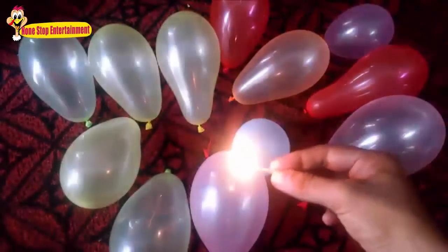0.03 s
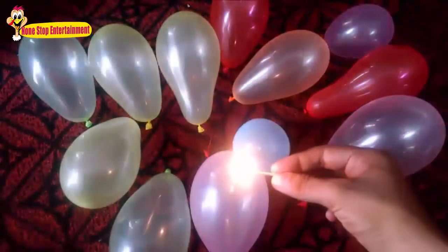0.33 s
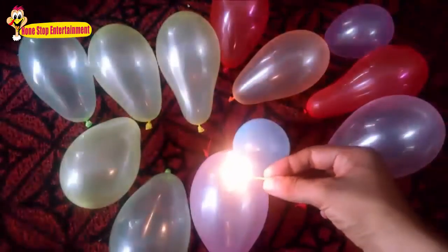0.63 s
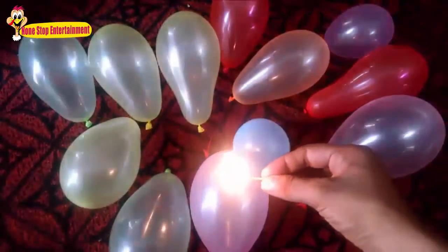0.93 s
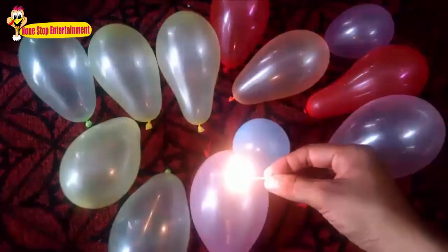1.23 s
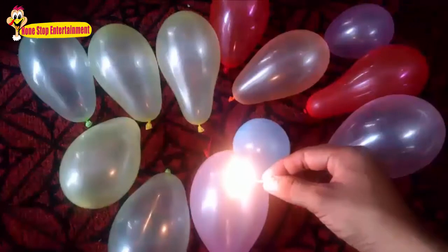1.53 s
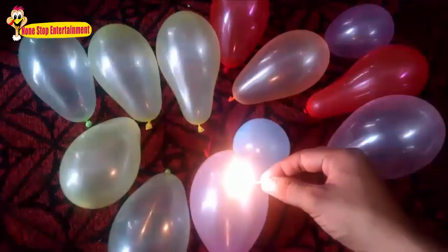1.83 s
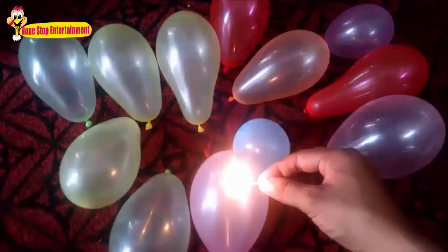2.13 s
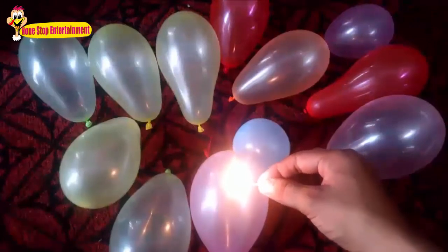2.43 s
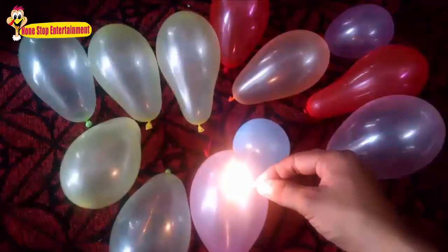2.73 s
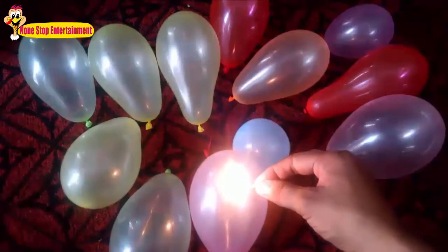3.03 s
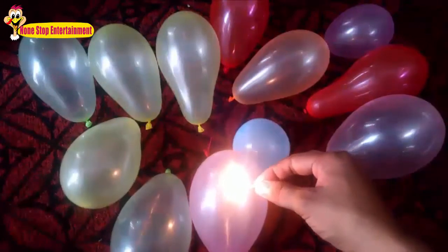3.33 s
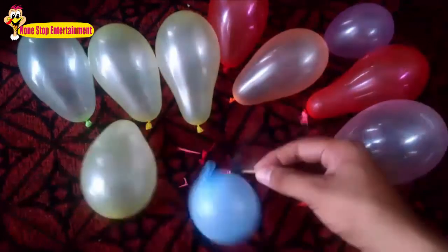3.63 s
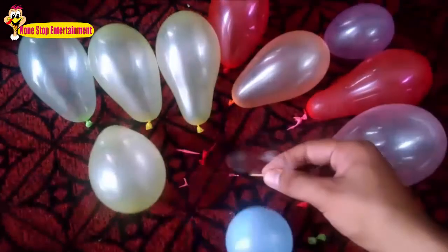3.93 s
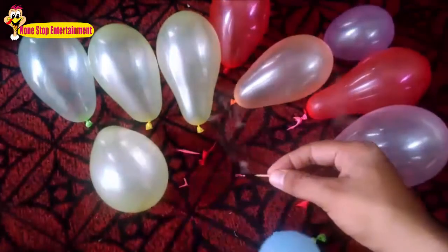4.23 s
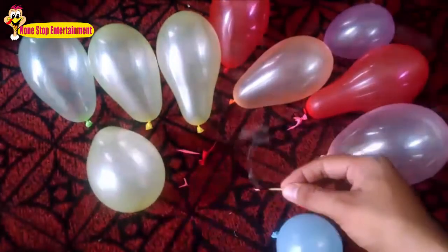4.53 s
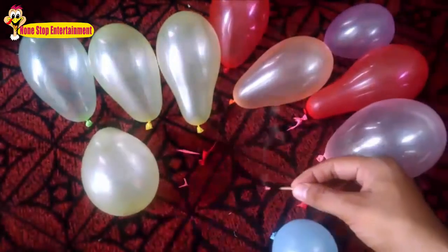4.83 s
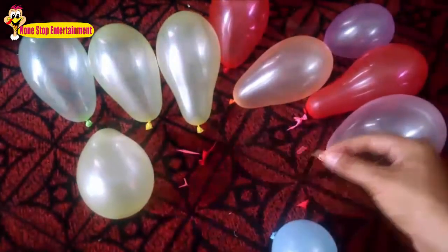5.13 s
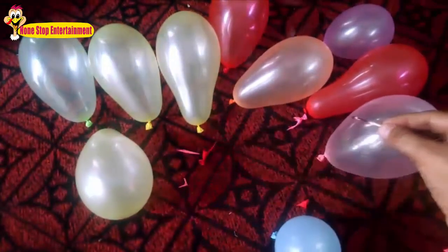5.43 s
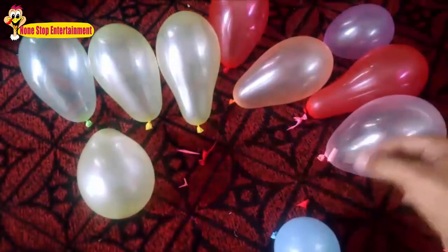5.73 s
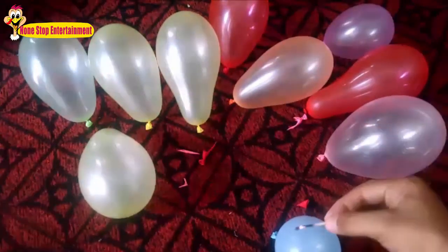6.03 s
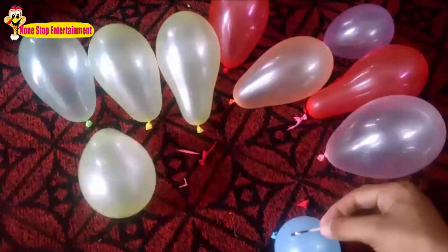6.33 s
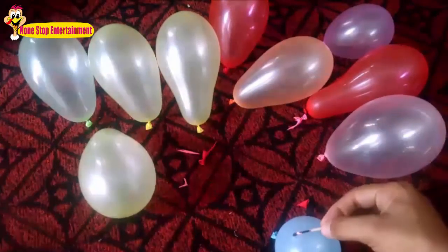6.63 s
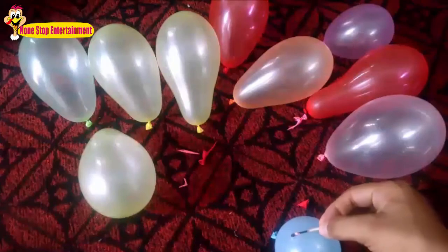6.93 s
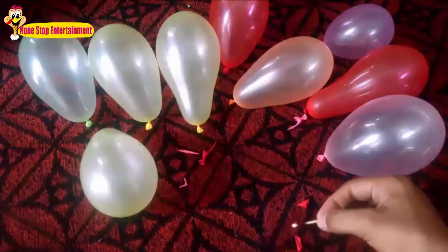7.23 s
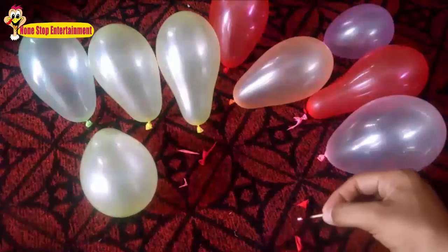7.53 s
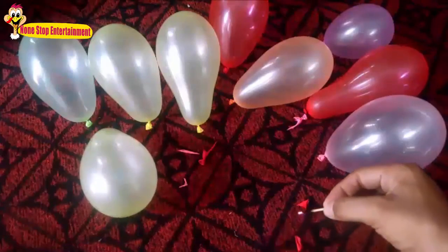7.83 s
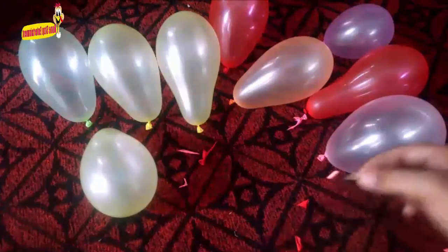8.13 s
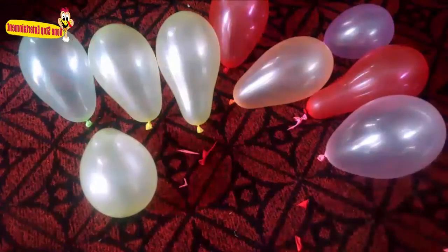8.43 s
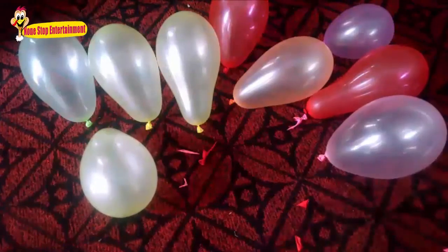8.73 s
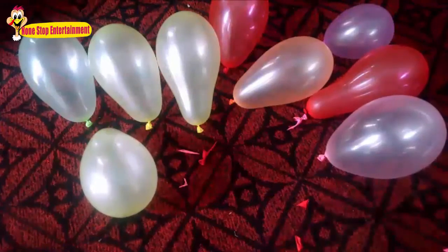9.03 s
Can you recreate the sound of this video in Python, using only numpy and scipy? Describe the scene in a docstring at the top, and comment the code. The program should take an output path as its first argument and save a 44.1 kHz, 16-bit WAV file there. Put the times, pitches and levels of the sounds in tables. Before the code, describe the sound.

A fan hums and hisses in a small room. A balloon bursts with a sharp, echoing bang that overloads the phone microphone, and the fan noise sinks away and creeps back. A few close scuffs, thumps and a snap follow. The fan's rush suddenly turns loud, then a second balloon bursts just as hard. The low hum returns and swells twice. The sound cuts out briefly three times along the way.

```python
"""A fan hums and hisses in a small carpeted room; after a scuff, the sound cuts out briefly. The level dips,
and a balloon bursts at a match flame: its skin rips, the walls echo, the room rings. The phone clips and ducks
its gain, so the fan sinks away and creeps back. Scuffs, thumps and a snap follow, and the sound cuts out twice
more. The level then jumps up loud until a second balloon bursts and overloads the phone again. As the gain
recovers, the deep hum wells up twice."""
import sys
import numpy as np
from scipy import signal
from scipy.fft import rfft, irfft
from scipy.io import wavfile
from scipy.ndimage import uniform_filter1d

SR = 44100
rng = np.random.default_rng(int(sys.argv[2]) if len(sys.argv) > 2 else 0)


def generate_wav(sig):
    """Save sig (samples, or channels by samples) to the path in sys.argv[1] as 16-bit PCM at SR."""
    pcm = np.round(np.clip(np.atleast_2d(sig).T, -1, 1) * 32767).astype(np.int16)
    wavfile.write(sys.argv[1], SR, pcm)


N = 409248
TIME = np.arange(N) / SR
FREQ = np.maximum(np.arange(N // 2 + 1) * SR / N, 1)
PORT_LAG_S = .000394  # travel time of sound between the phone's two microphone ports

# balloon bursts: (time [s], level [dB], rise [s], tilt [dB/octave], skin's bright band [Hz], lift [dB])
BURSTS = [(3.5277, 11, .0005, 0.2, 7400, 7), (7.3052, 12, 0.018, 0.7, 4600, 5)]
# spectrum of tearing rubber: (frequency [Hz], relative level [dB])
CRACK_SPECTRUM = [(30, 1.5), (90, -21), (200, -6.5), (330, -4), (520, -0.5), (1200, -2), (2200, -5),
                  (4500, -8.5), (7500, -8), (10000, -7), (15000, -12)]
# spectrum of the room's reverberation: (frequency [Hz], relative level [dB])
RING_SPECTRUM = [(40, -18.5), (130, 0.5), (300, -1), (700, 6), (1400, -2), (2300, -6.5), (4000, -5.5),
                 (7500, -3), (10500, -7), (15000, -20.5)]
# reverberation time: (frequency [Hz], time to fall 60 dB [s])
ROOM_T60 = [(100, 1), (600, 0.65), (2500, 0.73), (7000, 0.67), (14000, 0.51)]
# room resonances: (frequency [Hz], width [Hz], lift [dB])
ROOM_MODES = [(517, 71, 3.5), (854, 90, 5.5), (1280, 110, 7.5), (1490, 90, 4), (3620, 350, 1)]
# clusters of wall reflections: (time [s], level [dB], spread [s], boom frequency [Hz], boom lift [dB])
ECHOES = [(3.572, 3.5, 0.016, 534, 24), (3.596, 1, 0.0075, 900, 6), (3.636, -10.5, .016, 930, 19),
          (3.671, -13, 0.0059, 900, 3), (3.708, -26, 0.016, 830, 20), (7.346, 0.5, 0.012, 530, 11),
          (7.365, 8.5, 0.0054, 1100, 7), (7.391, -5.5, .007, 900, -4)]
# scuffs of hand and rubber, the last as the skin starts to give:
# (time [s], peak level [dB], centre [Hz], width [Hz], left minus right [dB])
SCUFFS = [(2.375, -24, 4000, 2900, 0), (4.811, -19, 1000, 2400, 2), (4.8856, -12, 1800, 4000, 1),
          (5.2, -20, 900, 1300, 4.5), (7.288, -3.5, 2710, 1200, 3)]
# thumps on the phone: (time [s], peak level [dB], frequency [Hz], decay [s], left minus right [dB])
THUMPS = [(3.536, 6, 190, .009, 1.5), (4.815, -9, 76, .007, 1.5), (4.893, -14, 76, 0.0088, 0),
          (5.203, -3.5, 82.6, 0.013, -2), (7.31, -4, 54.5, 0.012, 8), (7.440, 0, 34, 0.018, 4)]
# resonances of the snap: (frequency [Hz], width [Hz], relative level [dB])
SNAP_MODES = [(6500, 4000, -3), (2200, 1300, 1), (1320, 200, -4)]
# spectrum of air rushing through the fan: (frequency [Hz], relative level [dB])
AIR_SPECTRUM = [(28, -5), (46, -10), (64, 0), (85, -6), (145, 3), (205, -3), (330, -6.5), (560, -3.5),
                (950, -9.5), (1800, -15), (2450, -15.5), (2900, -14), (3500, -18.5), (5000, -19),
                (9000, -23), (10300, -28.5), (11500, -27.5), (14000, -31), (15500, -37.5)]
# resonances that colour the rushing air: (frequency [Hz], width [Hz], lift [dB])
AIR_MODES = [(880, 25, -0.5), (1293, 32, 2.5), (1480, 40, 1)]
# motor hum: (frequency [Hz], level [dB], left minus right [dB], phase lead of left [rad])
HUM_PARTIALS = [(66, -48.5, -8.5, 1.6), (125.7, -44.5, -13.5, 0.69), (249.4, -40.5, -3.5, -1.55),
                (501, -50, -9.5, 1), (520, -49, -13.5, 0.24), (619.4, -45.5, -2.5, 0.57),
                (820, -51.5, 3.5, 0.022)]
# second motor: (frequency [Hz], relative level [dB], left minus right [dB], phase lead of left [rad])
DRONE_PARTIALS = [(124, -6, -5, .9), (169, -4, -1.5, 1.3), (252, 0.5, -8, -1)]
# spells in which the second motor is heard: (start [s], end [s], level [dB])
DRONE_SPELLS = [(3.147, 5.3, -34.5), (7.352, 8.903, -36.5)]
# swells of the deep hum: (time of crest [s], level [dB], spread [s])
HUM_SWELLS = [(7.12, -36.5, 0.11), (8.43, -30, 0.041), (8.76, -30.5, 0.039)]
# mismatch of the ports: (frequency [Hz], left minus right [dB], phase lead of left [rad])
PORT_MISMATCH = [(30, -2.5, 2.5), (65.2, -10, 2), (168, -6.5, 1), (241, -4, 1.04), (345, -5.5, -2.5),
                 (416, -2.5, 0.6), (910, -3, 0.51), (1480, -1, 0.5)]
# brief silences: (start [s], end [s])
GAPS = [(2.506, 2.670), (5.231, 5.272), (5.740, 6.039)]


def balloon_bursts(crack_t60=0.37, damping_hz=20000, skin_width_hz=2500, ring_db=-9.5, build_s=0.028):
    """Rupture and reverberation: the skin rips, the blast darkens as walls scatter it, the room rings."""
    out, age = np.zeros((2, N)), np.arange(SR) / SR
    blast = diffuse_field(cross=0.19, mismatch=0.69) * modal_gain(ROOM_MODES) ** 0.65
    room = diffuse_field(mismatch=0.79) * undb(across(RING_SPECTRUM, FREQ)) * modal_gain(ROOM_MODES)
    room_bands = split_bands(room)
    ragged = undb(2.0 * waver(130))
    for start, db, rise_s, tilt_db, skin_hz, skin_db in BURSTS:
        span = slice(int(start * SR), int(start * SR) + SR)
        colour = undb(across(CRACK_SPECTRUM, FREQ) + tilt_db * np.log2(FREQ / 2000))
        colour *= modal_gain([(skin_hz, skin_width_hz, skin_db)])
        crack = sum(band[:, span] * decay(age, crack_t60 / (1 + (hz / damping_hz) ** 2))
                    for hz, band in split_bands(blast * colour))
        crack *= ragged[span] * (1 - np.exp(-age / rise_s))
        ring = sum(band[:, span] * decay(age, across(ROOM_T60, hz)) for hz, band in room_bands)
        ring *= 1 - np.exp(-age / build_s)
        out[:, span] += undb(db) * (crack + undb(ring_db) * ring)
    return out


def wall_echoes(dull_hz=2500, boom_width_hz=140):
    """Early reflection: the walls return each bang in booming clusters that have lost some treble."""
    reflected = diffuse_field(mismatch=.5) / (1 + (FREQ / dull_hz) ** 2) ** 0.4
    out = np.zeros((2, N))
    for time, db, spread_s, boom_hz, boom_db in ECHOES:
        boom = undb(boom_db * abs(resonance(boom_hz, boom_width_hz)))
        out += undb(db) * unit_rms(irfft(reflected * boom, N)) * bell(time, spread_s)
    return out


def scuffs(rise_s=0.0049, decay_s=0.009):
    """Friction: short scrapes of hand and rubber drive a broad resonance with noise."""
    out, friction = np.zeros((2, N)), diffuse_field(mismatch=0.41)
    for start, db, hz, width_hz, side_db in SCUFFS:
        age = TIME - start
        push = np.clip(age / rise_s, 0, 1) * np.exp(-np.clip((age - rise_s) / decay_s, 0, 20))
        scrape = irfft(friction * resonance(hz, width_hz), N)
        out += pan(side_db) * at_peak(push * scrape, db)
    return out


def thumps(rise_s=0.001):
    """Impulse response: handling and each burst's puff of air set off a few low swings at the phone."""
    age = np.arange(SR // 3) / SR
    onset = 1 - np.exp(-age / rise_s)
    return sum(close_by(onset * damped_sine(age, hz, decay_s), start, db, side_db)
               for start, db, hz, decay_s, side_db in THUMPS)


def snap():
    """Free vibration: one sharp snap rings in modes that die the faster the wider they are."""
    age = np.arange(SR // 3) / SR
    ring = sum(at_peak(damped_sine(age, hz, 1 / (np.pi * width)), db) for hz, width, db in SNAP_MODES)
    return close_by(ring, start=4.893, db=2.5, side_db=-2)


def fan_air(level_db=-29.5, flicker_db=1.47):
    """Flow noise: air rushing through the fan flickers band by band and flutters as a whole."""
    rush = diffuse_field(cross=0.82, ripple_db=1.9) * undb(across(AIR_SPECTRUM, FREQ))
    bands = split_bands(rush * modal_gain(AIR_MODES))
    air = sum(band * undb(flicker_db * waver(25)) for _, band in bands)
    flutter = 1 + 0.063 * waver(35) + 0.091 * waver(6.6)
    return undb(level_db) * air * flutter


def fan_motors(attack_s=0.33, release_s=0.63):
    """Periodic vibration: one motor hums throughout, a second drones in spells, a deep tone swells."""
    hum = sum(undb(db) * motor_tone(hz, side_db, phase) for hz, db, side_db, phase in HUM_PARTIALS)
    drone = sum(undb(db) * motor_tone(hz, side_db, phase, depth=.1, drift_rad=0.95)
                for hz, db, side_db, phase in DRONE_PARTIALS)
    spells = sum(undb(db) * gate(start, end, attack_s, release_s) for start, end, db in DRONE_SPELLS)
    swells = sum(undb(db) * bell(time, spread_s) for time, db, spread_s in HUM_SWELLS)
    return hum + spells * drone + swells * motor_tone(hz=126.1, side_db=-9.5, phase=0.7)


def motor_tone(hz, side_db, phase, depth=.18, drift_rad=0.5):
    """Random modulation: one partial of a motor wavers in amplitude and phase."""
    angle = 2 * np.pi * hz * TIME + drift_rad * waver(3.3) + np.array([[phase], [-phase]]) / 2
    return np.sqrt(2) * np.sin(angle) * (1 + depth * waver(29)) * pan(side_db)


def level_envelope():
    """Amplitude envelope: the level dips and creeps back, then surges until the second burst."""
    dip_at, dip_db, drop_s, recover_db_per_s = 3.138, -12, 0.02, 15.5
    surge_at, surge_db, jump_s, release_s = 6.504, 13, 0.0039, .07
    overshoot_db, settle_s, crest_db = 4, 0.13, 3
    dip = np.minimum(dip_db + recover_db_per_s * (TIME - dip_at), 0)
    dip *= np.clip((TIME - dip_at) / drop_s, 0, 1)
    overshoot = overshoot_db * np.exp(-np.maximum(TIME - surge_at, 0) / settle_s)
    crest = crest_db * bell(time=6.97, spread_s=0.11)
    surging = gate(surge_at, BURSTS[-1][0] + release_s, jump_s, release_s)
    return undb(dip + (surge_db + overshoot + crest) * surging)


def diffuse_field(cross=0.96, mismatch=1.0, ripple_db=1.5):
    """Spatial coherence: the spectrum of room-filling noise at two ports, less alike as pitch rises."""
    mid, side, direct = rfft(rng.standard_normal((3, N)))
    sign = np.array([[1], [-1]])
    delay = np.exp(-2j * np.pi * FREQ * PORT_LAG_S)
    coherence = 0.94 * np.sinc(2 * FREQ * PORT_LAG_S)
    # above the bass each port has the delayed other one taken from it: wider stereo, combed mid and side
    crossfeed = cross * delay / (1 + (FREQ / 4900) ** 4) / (1 + (170 / FREQ) ** 4)
    mid_gain = np.sqrt(1 + coherence) * (1 - crossfeed)
    side_gain = np.sqrt(1 - coherence) * (1 + crossfeed)
    pair = (mid_gain * mid + sign * side_gain * side) / np.hypot(abs(mid_gain), abs(side_gain))
    # part of the treble comes straight from the right and reaches the left late and inverted
    shade_db = 2.0 * abs(resonance(5300, 6000)) ** 2
    share = 0.72 * abs(resonance(8500, 14000))
    from_right = np.array([-delay * undb(-shade_db), undb(shade_db)])
    pair = pair * np.sqrt(1 - share ** 2) + share * direct * from_right
    hz, *columns = np.transpose(PORT_MISMATCH)
    side_db, phase = (mismatch * np.interp(np.log(FREQ), np.log(hz), column) * sign / 2
                      for column in columns)
    # standing waves lift and sink narrow bands
    ripple = unit_rms(uniform_filter1d(rng.standard_normal(len(FREQ)), size=150))
    return pair * undb(side_db + ripple_db * ripple) * np.exp(1j * phase * (FREQ < hz[-1]))


def close_by(sound, start, db, side_db):
    """Path difference: the left port takes in a sound right at the phone late and inverted."""
    right = np.zeros(N)
    first = int(start * SR)
    right[first:first + len(sound)] = at_peak(sound, db)
    left = -np.roll(right, int(PORT_LAG_S * SR))
    return pan(side_db) * np.array([left, right])


def resonance(hz, width_hz):
    """Frequency response of a damped oscillator."""
    return 1 / (1 + 1j * (FREQ / hz - hz / FREQ) * hz / width_hz)


def modal_gain(modes):
    """Resonant colouring: each mode lifts or lowers a flat response around its frequency."""
    return undb(sum(db * abs(resonance(hz, width_hz)) ** 2 for hz, width_hz, db in modes))


def damped_sine(age, hz, decay_s):
    """Free motion of a damped oscillator."""
    return np.sin(2 * np.pi * hz * age) * np.exp(-age / decay_s)


def decay(age, t60):
    """Exponential decay by 60 dB in t60 seconds."""
    return np.exp(-np.log(1000) * age / t60)


def gate(start, end, attack_s, release_s):
    """Trapezoidal envelope: rise from 0 at the start, hold at 1, fall to 0 at the end."""
    return np.clip(np.minimum((TIME - start) / attack_s, (end - TIME) / release_s), 0, 1)


def bell(time, spread_s):
    """Gaussian envelope of height 1."""
    return np.exp(-((TIME - time) / spread_s) ** 2)


def waver(rate_hz, size=16384):
    """Low-passed noise: a slow random fluctuation of rms 1."""
    slow = irfft(rfft(rng.standard_normal(size)) / (1 + (FREQ[:size // 2 + 1] / rate_hz) ** 4))
    return unit_rms(np.interp(np.linspace(0, size - 1, N), np.arange(size), slow))


def split_bands(spectrum, count=7):
    """Filter bank: overlapping bands that sum to rms 1, as (centre [Hz], sound) pairs."""
    centres = np.geomspace(60, 15000, count)
    spectrum = spectrum / np.std(irfft(spectrum, N))
    return [(hz, irfft(spectrum * np.interp(np.log(FREQ), np.log(centres), share), N))
            for hz, share in zip(centres, np.eye(count))]


def across(rows, hz):
    """Interpolation of (frequency [Hz], value) rows on a logarithmic frequency axis."""
    points, values = np.transpose(rows)
    return np.interp(np.log(hz), np.log(points), values)


def pan(db):
    """Left and right gains for a level difference."""
    return undb(np.array([[db], [-db]]) / 2)


def undb(db):
    """Amplitude ratio of a level in decibels."""
    return 10 ** (np.asarray(db) / 20)


def unit_rms(x):
    """Normalisation to rms 1."""
    return x / np.sqrt(np.mean(x ** 2))


def at_peak(x, db):
    """Normalisation to a peak level."""
    return undb(db) * x / abs(x).max()


def scene():
    """Superposition: the bursts, their echoes and the handling sounds add to the fan."""
    fan = (fan_air() + fan_motors()) * level_envelope()
    return balloon_bursts() + wall_echoes() + scuffs() + thumps() + snap() + fan


def gain_control(x, limit_db=-8, max_cut_db=14, recover_db_per_s=12, hold_s=0.11, attack_s=0.031):
    """Automatic gain control: loud sound turns the gain down fast; it waits, then climbs steadily."""
    power = uniform_filter1d(np.mean(x ** 2, axis=0), SR // 50)
    level_db = 10 * np.log10(np.maximum(power, 1e-12))
    demand_db = np.clip(2 * (level_db - limit_db), 0, max_cut_db)
    climb_db = recover_db_per_s * TIME
    cut_db = np.maximum.accumulate(demand_db + climb_db) - climb_db
    held_db = np.maximum(cut_db, np.interp(TIME - hold_s, TIME, cut_db))
    pole = np.exp(-1 / (attack_s * SR))
    return x * undb(-signal.lfilter([1 - pole], [1, -pole], held_db))


def dropouts(step_db=-20, t60=0.085):
    """Muting: at each gap the level steps down, decays exponentially and comes back at once."""
    gain = np.ones(N)
    for start, end in GAPS:
        inside = (TIME >= start) & (TIME < end)
        gain[inside] = undb(step_db) * decay(TIME[inside] - start, t60)
    return gain


def record(dry):
    """Overload and band limiting: the phone rides its gain, clips the bangs, drops out, cuts the top."""
    clipped = np.clip(gain_control(dry), -1, 1)
    low_pass = signal.ellip(12, .1, 100, 15600, fs=SR, output="sos")
    return signal.sosfilt(low_pass, clipped * dropouts())


dry = scene()
out = record(dry)
generate_wav(out)
```